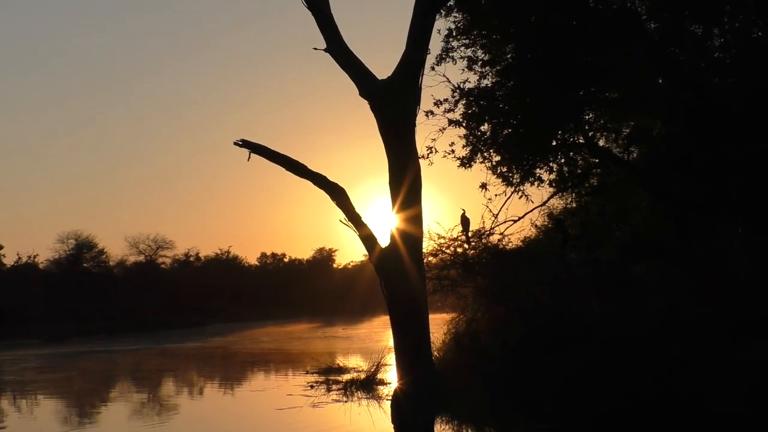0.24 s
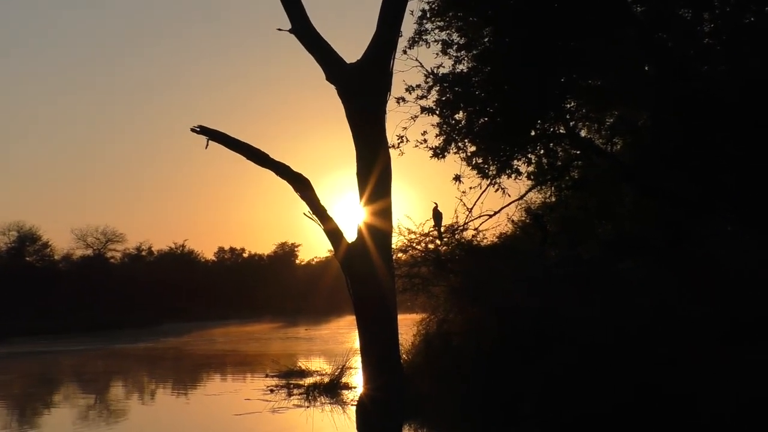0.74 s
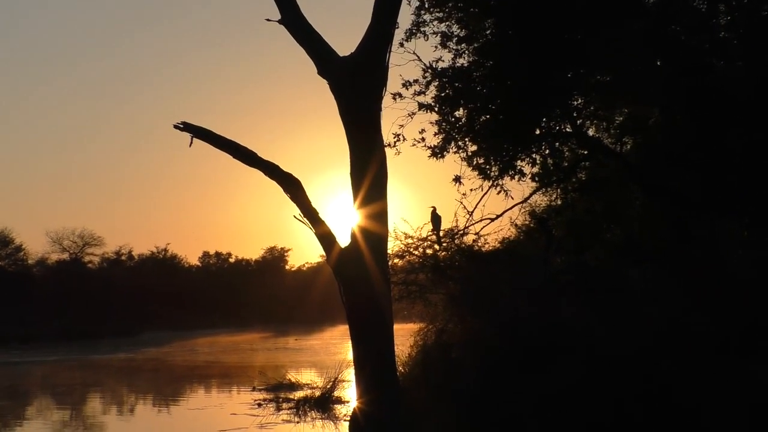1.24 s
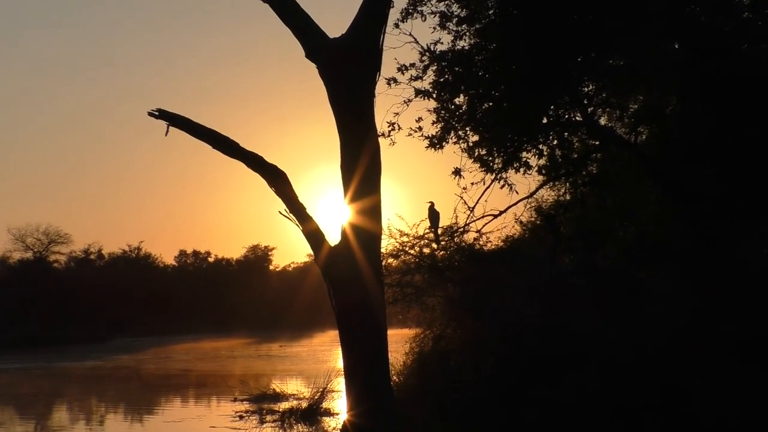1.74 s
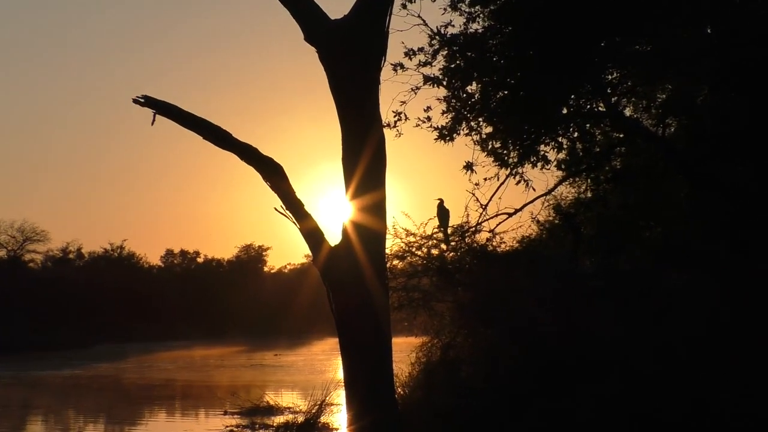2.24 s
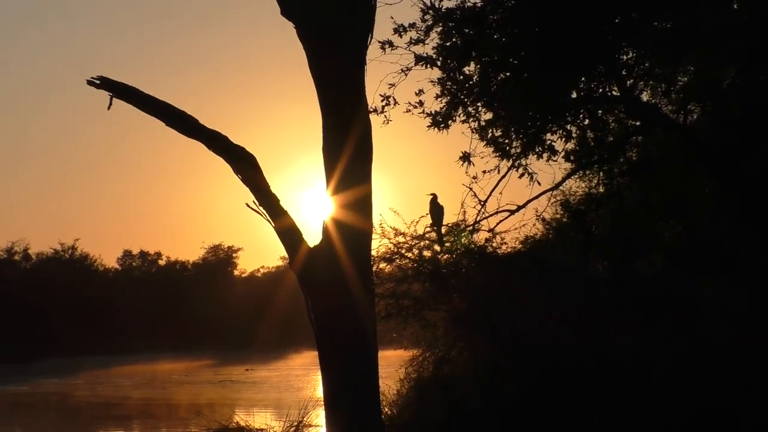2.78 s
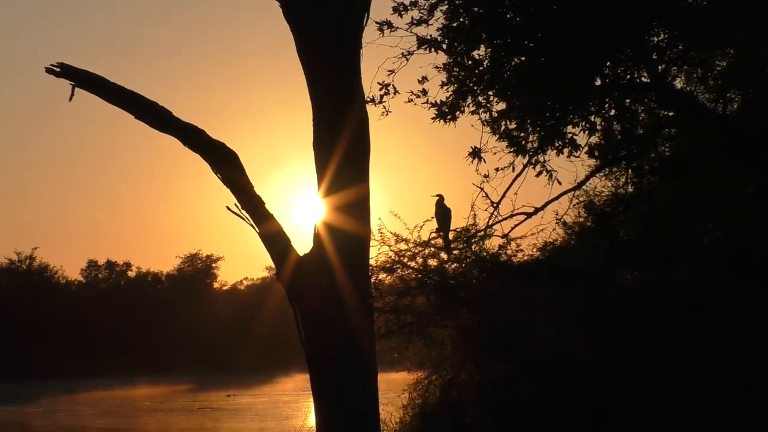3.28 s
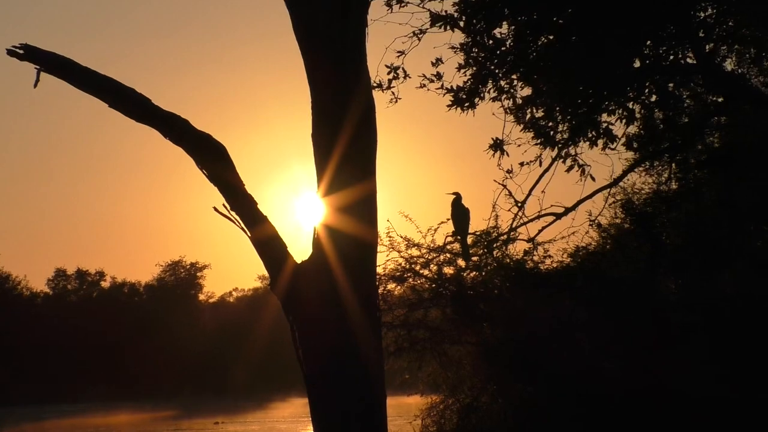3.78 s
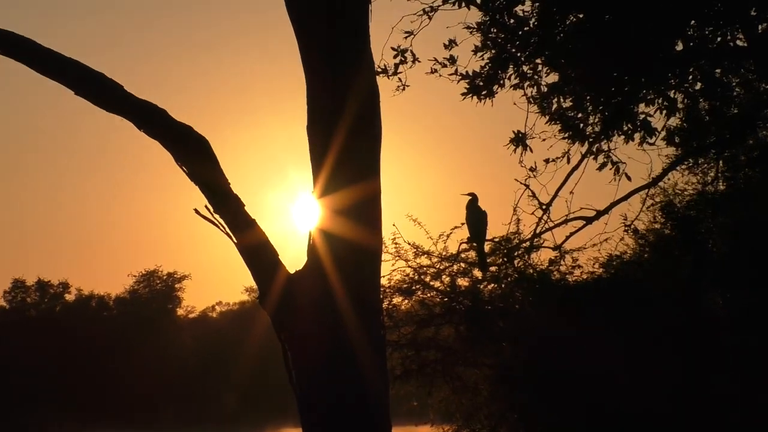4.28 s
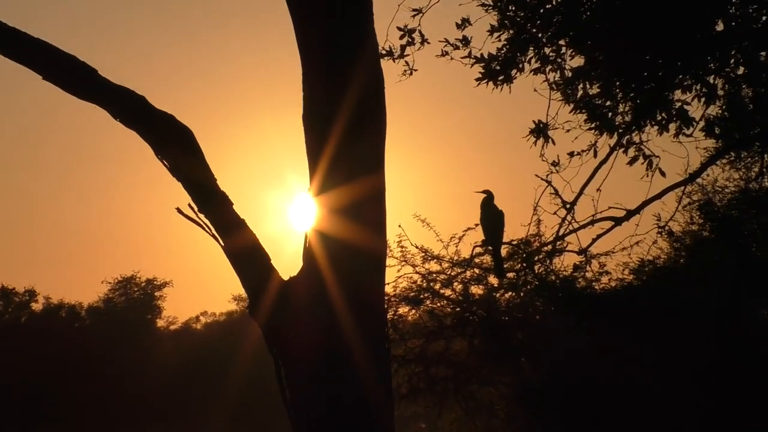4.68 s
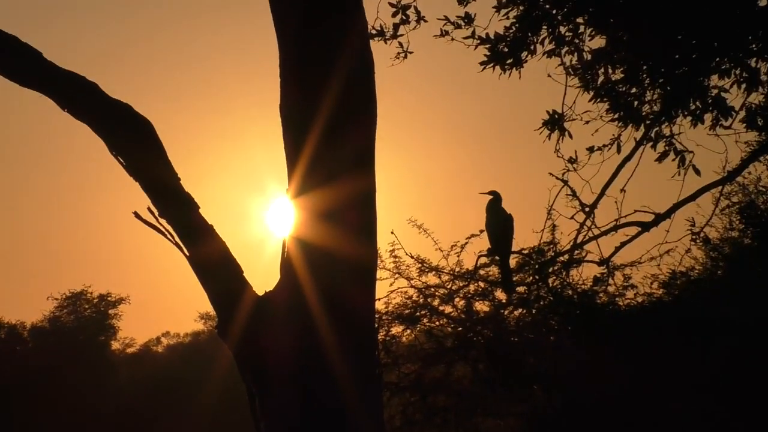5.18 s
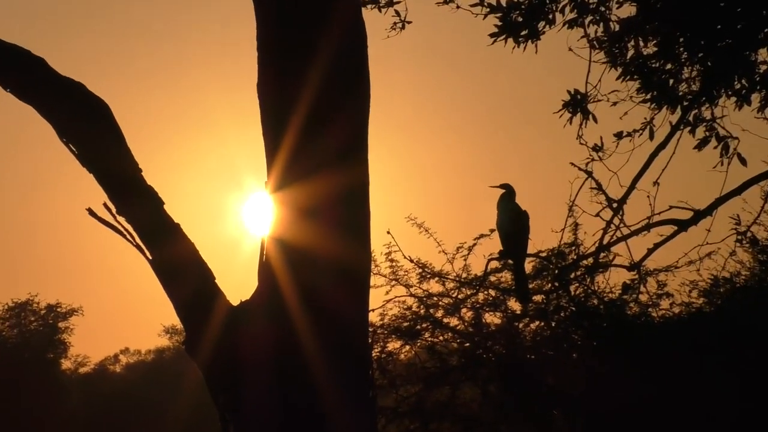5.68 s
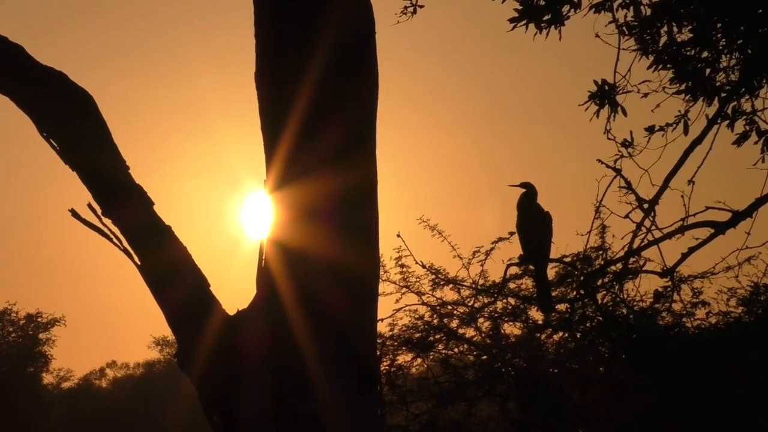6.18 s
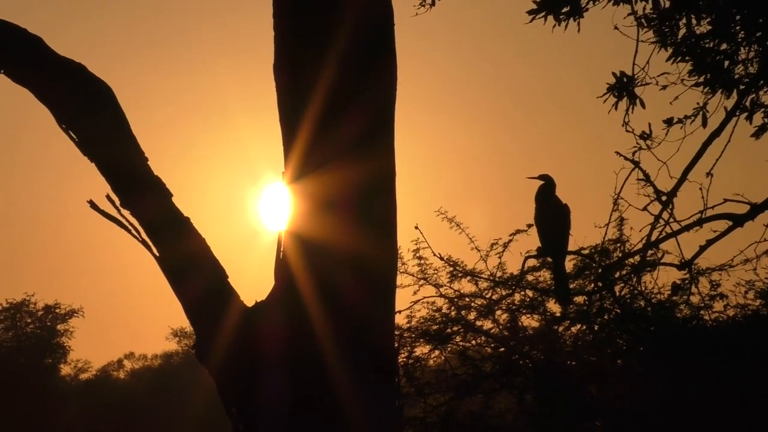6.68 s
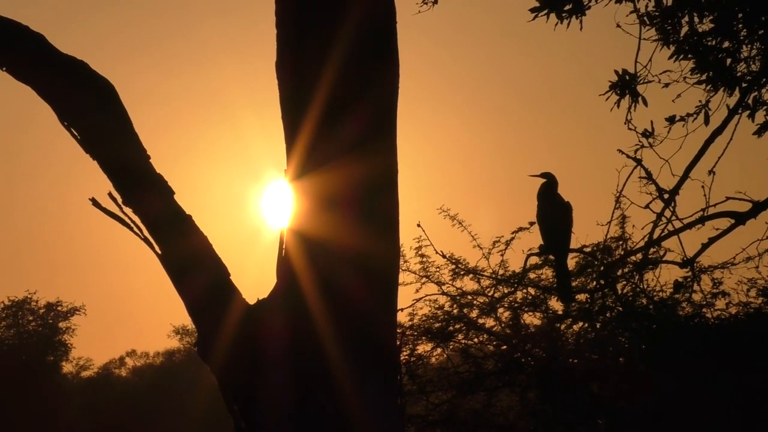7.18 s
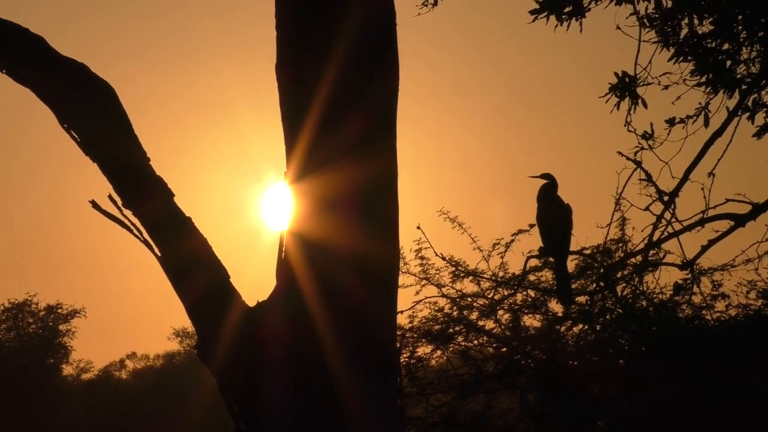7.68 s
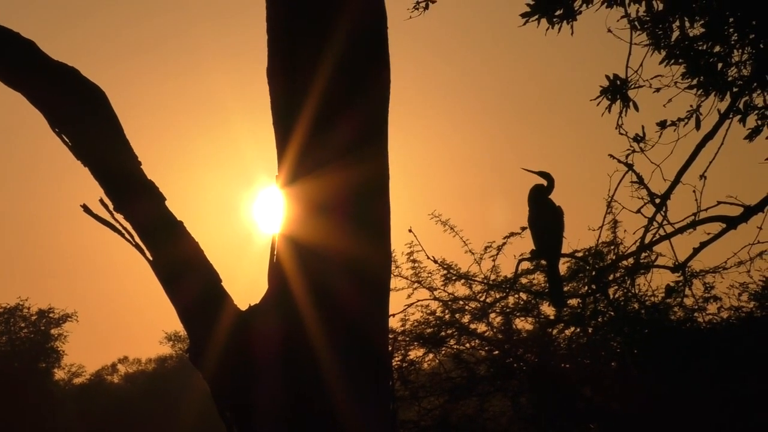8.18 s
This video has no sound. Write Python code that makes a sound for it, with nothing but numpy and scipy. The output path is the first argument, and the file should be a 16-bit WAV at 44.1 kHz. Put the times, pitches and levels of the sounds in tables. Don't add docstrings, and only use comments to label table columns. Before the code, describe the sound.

A quiet stereo dawn ambience with low air rumble, murmuring water and slight hiss. A close songbird gives two bright downward whistles after small hard knocks; feathers rustle. Far birds pipe thinly and slur quick notes. Harsh single clucks on the right turn into rasping, upward-breaking cackles led by short fluty whistles, closing in a dense run with another steep whistle and a soft flutter. Trees add a hazy echo.

```python
import sys
import numpy as np
from scipy import signal
from scipy.fft import rfft, irfft, next_fast_len
from scipy.io import wavfile
from scipy.ndimage import uniform_filter1d

SR = 44100
rng = np.random.default_rng(int(sys.argv[2]) if len(sys.argv) > 2 else 0)


def boost(x):
    u = np.asarray(x, float) / 20
    return 10 ** u


def generate_wav(signal):
    frames = np.transpose(np.atleast_2d(signal))
    scaled = np.clip(frames, -1, 1) * 32767
    pcm = np.round(scaled).astype(np.int16)
    wavfile.write(sys.argv[1], SR, pcm)


N = 371763


def rms_one(x):
    return x / np.sqrt(np.mean(x ** 2) + 1e-20)


def at_hz(points, hz):
    points_hz, points_db = np.array(points)[:, 0], np.array(points)[:, 1]
    return np.interp(np.log(hz), np.log(points_hz), points_db)


def bins_hz(size):
    return np.maximum(np.arange(size // 2 + 1) * SR / size, 1)


def wobble(rate_hz, size):
    knots = rng.standard_normal(size // 64 + 2)
    position = np.arange(size) * min(rate_hz / SR, 1 / 64)
    before = position.astype(int)
    part = (1 - np.cos(np.pi * (position % 1))) / 2
    return knots[before] + part * (knots[before + 1] - knots[before])


def unroll(rows, edge_s):
    s, *columns = np.transpose(rows)
    t = np.arange(s[0], s[-1], 1 / SR)
    fade = np.clip(np.minimum(t - s[0], s[-1] - t) / edge_s, 0, 1)
    return round(s[0] * SR), fade, [np.interp(t, s, c) for c in columns]


def add(track, start, sound):
    track[start:start + len(sound)] += sound[:N - start]


def coloured(white, spectrum):
    count = white.shape[-1]
    size = next_fast_len(count)
    shaped = rfft(white, size) * boost(at_hz(spectrum, bins_hz(size)))
    return rms_one(irfft(shaped, size)[..., :count])


def glides(rows, start_db, end_db):
    swell = 0.47
    return [[(s, a, db + start_db), (s + swell * d, a + swell * (b - a), db), (s + d, b, db + end_db)]
            for s, d, db, a, b in rows]


def whistles(notes, overtone_db, flutter_db, edge_s, waver, beak=None):
    out = np.zeros(N)
    for rows in notes:
        start, fade, (hz, db) = unroll(rows, edge_s)
        unsteady_hz = uniform_filter1d(hz, size=130) * (1 + waver * wobble(96.0, len(hz)))
        phase = 2 * np.pi * np.cumsum(unsteady_hz) / SR
        octave_db = overtone_db
        if beak is not None:
            octave_db = at_hz(beak, hz) - 0.79 * (db + 24.5)
        harmonics = np.sin(2 * phase) + boost(overtone_db) * np.sin(3 * phase)
        tone = np.sin(phase) + boost(octave_db) * harmonics
        level = boost(db + flutter_db * wobble(105.5, len(hz)))
        add(out, start, np.sqrt(2) * fade * level * tone)
    return out


def among_trees(x, pan_db, lead, near_db, far_db):
    t = np.arange(SR) / SR
    pan = boost(pan_db / 2 * np.array([[1], [-1]]))
    scatter = rng.standard_normal((3, len(t)))
    alike = np.clip(.8 - t / 3.6, .45, 1)
    scatter = alike * scatter[0] + np.sqrt(1 - alike ** 2) * scatter[1:]
    branches = pan * boost(near_db - 60 * t / 0.18)
    far_bank = np.minimum(t / 0.05, 1) * boost(far_db - 60 * t / 0.89)
    tail = signal.lfilter([1], [1, -.3], scatter * (branches + far_bank) / np.sqrt(SR / 100))
    pair = np.array([np.interp(np.arange(N) + lead, np.arange(N), x), x])
    return pan * pair + signal.fftconvolve(pair, tail, axes=1)[:, :N]


def ambience():
    # (frequency [Hz], density [dB per Hz])
    quiet_air = [(12, -39), (20, -8.5), (96, -0.5), (172, 0), (399, -7), (590, -16), (698, -7.5),
                 (1030, -5), (2460, -13.5), (2910, -12.5), (3250, -13.5), (6720, -32.5), (12100, -20.5),
                 (14700, -24.5), (16000, -23.5)]
    # (time [s], level [dB])
    river_levels = [(0, -54.5), (.4, -59.5), (.8, -52.5), (1.62, -50), (1.85, -59), (2.7, -50.5),
                    (3.26, -69), (3.61, -65), (3.8, -51), (4.34, -43), (4.75, -45), (5.35, -58.5),
                    (5.75, -47), (6.1, -53), (6.78, -46), (7.3, -50), (7.62, -45.5), (8.43, -44)]
    # (frequency [Hz], density [dB per Hz])
    riffle_colour = [(500, -22), (900, -4), (1700, 0), (2600, -2), (4500, -21), (9000, -28.5)]
    # (frequency [Hz], density [dB per Hz])
    breeze_colour = [(40, -14), (120, -2.5), (250, -5), (450, -5), (800, -27)]
    # (time [s], rise [dB])
    gust_rises = [
        (.4, 4.8),
        (.87, 8.3),
        (1.25, 4.7),
        (3.75, 4.6),
        (5.75, 5.2),
        (6.5, 3.8),
        (7.55, 4.2),
        (7.9, 6.8),
    ]
    # (centre [Hz], width [Hz], level [dB])
    insect_choruses = [
        (2840, 150, -63),
        (12500, 120, -97),
    ]
    # (frequency [Hz], side re mid [dB])
    field_width = [(60, -1), (110, -5), (200, -2.5), (380, -2), (700, -12.5), (1290, -4), (2380, -6.5),
                   (4400, -1), (8120, -4.5), (15000, 3.5)]
    # (frequency [Hz], left re right [dB])
    field_leaning = [(60, -0.5), (240, -0.9), (950, 0.37), (3770, -0.81), (15000, 0.21)]
    size = next_fast_len(N)
    hz = bins_hz(size)
    width = boost(at_hz(field_width, hz))
    lean = boost(at_hz(field_leaning, hz) / 2 * np.array([[1], [-1]]))

    def layer(shape):
        mid, side = rfft(rng.standard_normal((2, size))) * shape
        pair = irfft(lean * (mid + width * side * [[1], [-1]]), size)[:, :N]
        return pair / np.sqrt(np.mean(pair.mean(axis=0) ** 2))

    t = np.arange(N) / SR
    water_db = np.interp(t, *np.transpose(river_levels))
    breeze_db = -54.5 + 0.39 * (water_db - water_db.mean())
    gust_s = 0.18
    breeze_db += sum(db * np.exp(-((t - s) / gust_s) ** 2) for s, db in gust_rises)
    out = boost(-50 - 0.28 + 1.7 * wobble(3.11, N)) * layer(boost(at_hz(quiet_air, hz)))
    out += boost(water_db - 2.0 + 1.3 * wobble(9.0, N)) * layer(boost(at_hz(riffle_colour, hz)))
    out += boost(breeze_db - 4 + 1.4 * wobble(9.2, N)) * layer(boost(at_hz(breeze_colour, hz)))
    for centre_hz, width_hz, level_db in insect_choruses:
        chorus = layer(np.exp(-((hz - centre_hz) / width_hz) ** 2))
        out += boost(level_db + 1.1 * wobble(9.9, N)) * chorus
    return out


def far_pipers():
    # (time from start [s], pitch [Hz], level [dB])
    arch_shape = [
        (0, 2440, -1.5),
        (.018, 2710, -1),
        (.038, 2906, 1.5),
        (.06, 2730, -5),
    ]
    # (time [s], level [dB])
    arch_times = [
        (.088, -52),
        (.92, -51.5),
        (1.629, -49),
        (2.433, -48),
        (7.62, -47),
        (8.346, -46.5),
    ]
    # (start [s], level [dB], pitch [Hz])
    pip_times = [
        (5.53, -50, 2010),
        (6.62, -44.5, 1950),
        (6.92, -44, 1900),
        (7.285, -44, 1990),
        (7.46, -45, 1943),
        (7.61, -42, 1964),
        (7.765, -44, 1990),
        (8.15, -43, 1924),
        (8.33, -41, 1950),
    ]
    # (start [s], length [s], level [dB], first pitch [Hz], last pitch [Hz])
    pipe_glides = [(2.106, 0.056, -51.5, 2196, 1840), (2.175, 0.062, -49.5, 2104, 1890),
                   (2.245, 0.051, -59.5, 1890, 2000), (2.3, 0.047, -52, 1985, 2104),
                   (2.411, 0.023, -50, 2030, 2260), (2.427, 0.032, -53, 2235, 2070),
                   (3.265, 0.15, -58, 2050, 1445), (3.43, 0.047, -57.5, 2100, 1890),
                   (6.188, 0.092, -59, 2050, 1650), (6.69, 0.032, -52, 1410, 1500),
                   (6.733, .02, -46, 1830, 2170), (6.75, 0.04, -43.5, 2145, 2100),
                   (6.86, 0.038, -47.5, 2204, 2125)]
    arches = [[(s + t, hz, db + rel_db) for t, hz, rel_db in arch_shape] for s, db in arch_times]
    pips = [(s, 0.023, db, hz, hz) for s, db, hz in pip_times]
    notes = arches + glides(pips, start_db=-4, end_db=-15) + glides(pipe_glides, start_db=3.5, end_db=-2)
    far = whistles(notes, overtone_db=-29, flutter_db=1.0, edge_s=0.0038, waver=0.0053)
    return among_trees(far, pan_db=-6.5, lead=-0.77, near_db=-6.5, far_db=-15.5)


def knocks():
    # (time [s], peak [dB], bright part re peak [dB], leg pitch [Hz])
    tripod_knocks = [(0.652, -27.5, -2.5, 300), (0.724, -32, 6.5, 285), (0.766, -28.5, -1.5, 330),
                     (2.714, -29.5, -3.5, 287), (2.74, -32, -0.5, 307), (3.84, -34, -15, 450),
                     (5.618, -34.5, -13, 323), (7.582, -27.5, -25, 195), (7.6, -34, -19, 343),
                     (7.626, -40, -20, 180), (7.678, -41, -20, 190)]
    # (frequency [Hz], level [dB], t60 [s])
    frame_modes = [(270, 3, 0.012)]
    # (frequency [Hz], level [dB], t60 [s])
    clamp_modes = [(757, -6.5, 0.082), (1235, 8, 0.01), (1630, 8, 0.0088), (3100, -0.5, 0.011),
                   (5000, -24, 0.0058)]
    out, t = np.zeros((2, N)), np.arange(SR // 5) / SR
    for s, db, bright_db, leg_hz in tripod_knocks:
        start = round(s * SR)
        modes = [(leg_hz, 0, .045)] + frame_modes
        modes = modes + [(hz, m + bright_db, t60) for hz, m, t60 in clamp_modes]
        luck = rng.normal(0, 1, (len(modes), 3))
        noisy_tail = signal.lfilter([1, -1], [1, -1.55, .7], rng.standard_normal((2, len(t))))
        for side in (0, 1):
            add(out[side], start, rms_one(noisy_tail[side]) * boost(db + bright_db - 15 - 60 * t / 0.047))
        for (hz, mode_db, t60), (level_luck, side_luck, phase_luck) in zip(modes, luck):
            dying = boost(db - 3.5 + mode_db + 2.0 * level_luck - 60 * t / t60)
            dying *= np.minimum(t * hz * 3, 1)
            for side, sign in enumerate((1, -1)):
                ring = np.sin(2 * np.pi * hz * t + sign * 0.39 * phase_luck)
                add(out[side], start, dying * boost(sign * (1.5 + 1.8 * side_luck)) * ring)
    return out


def near_songbird():
    # (time [s], pitch [Hz], level [dB])
    songbird_sweeps = [
        [(.7, 5270, -78), (.733, 6020, -69), (.743, 5820, -34.5), (.758, 5380, -31), (.771, 5280, -26.5),
         (.8, 4684, -17), (.811, 4530, -17.5), (.822, 2840, -48.5)],
        [(.94, 5050, -75), (.967, 5640, -48.5), (.98, 5480, -37), (.996, 5280, -25), (1.025, 4680, -18),
         (1.042, 4380, -17), (1.062, 3880, -47)],
        [(7.345, 6220, -65), (7.356, 6650, -42), (7.384, 5550, -17.5), (7.392, 5280, -27), (7.4, 5160, -14.5),
         (7.411, 4764, -16), (7.44, 4180, -19), (7.47, 3680, -29.5), (7.497, 2750, -37.5)],
    ]
    # (pitch [Hz], octave re a -25 dB note [dB])
    songbird_beak = [(3000, -50), (3900, -33.5), (4600, -23.5), (5300, -21.5), (6400, -17)]
    song = whistles(songbird_sweeps, overtone_db=-7, flutter_db=3.0, edge_s=0.00087, waver=0.00044,
                    beak=songbird_beak)
    return among_trees(song, pan_db=-8.5, lead=1.54, near_db=-9.5, far_db=-22.5)


def rustle():
    # (time [s], peak [dB], low part re peak [dB], t60 [s])
    wing_puffs = [(1.2105, -42, 11.5, 0.13), (1.226, -29.5, 6.5, 0.083), (1.2494, -55, 14, 0.14),
                  (1.307, -28.5, 3.5, 0.12), (1.3166, -32.5, 5, 0.092), (1.3413, -38, 5.5, 0.15),
                  (1.363, -28, 2, 0.069), (1.3933, -38.5, 6.5, 0.084), (1.4094, -75, 0, 0.1),
                  (1.7744, -45, -1, 0.11), (3.1194, -50, 8, 0.13), (6.971, -36, -13, 0.2),
                  (7.919, -38, 3, 0.11), (8.02, -42, 12.5, 0.23)]
    # (time [s], level [dB])
    wing_flurry = [
        (7.84, -62),
        (7.862, -59),
        (7.882, -46),
        (7.932, -40),
        (7.944, -45.5),
        (8.036, -40.5),
        (8.12, -58),
    ]
    white = rng.standard_normal((2, N)) * boost(1.33 * wobble(400.0, N))
    bright = coloured(white, [(2500, -9.5), (4500, -1.5), (9000, -5.5), (15000, -15.0)])
    dull = coloured(white[::-1], [(500, -36), (1000, 0.5), (2000, 4.0), (3500, -5.5), (6000, -40)])
    high, low, t = np.zeros(N), np.zeros(N), np.arange(SR // 3) / SR
    for s, db, low_db, t60 in wing_puffs:
        puff = np.minimum(t / 0.00053, 1) * boost(db - 8 - 60 * t / max(t60, .01))
        add(high, round(s * SR), puff)
        add(low, round(s * SR), puff * boost(low_db))
    start, fade, (db,) = unroll(wing_flurry, .015)
    add(high, start, fade * boost(db + 4.5))
    add(low, start, fade * boost(db - 3.0))
    first, second = bright * high + dull * low
    return np.array([first + 0.32 * second, first - 0.75 * second])


def hazy_slurs():
    # (start [s], length [s], level [dB], first pitch [Hz], last pitch [Hz])
    slur_notes = [(1.89, .045, -63, 3000, 4240), (1.99, 0.035, -60, 4400, 3490),
                  (2.028, 0.027, -65, 3600, 4500), (2.24, 0.036, -59, 2620, 4430),
                  (2.33, 0.029, -62, 4700, 4300), (2.352, .02, -51, 3780, 2910),
                  (2.37, 0.032, -54, 3500, 3020), (4.17, 0.05, -55, 2800, 4640),
                  (5.06, 0.036, -52, 2890, 2545), (5.112, 0.025, -43, 2530, 2430),
                  (6.255, 0.039, -47, 3380, 2940), (2.385, .02, -54, 3870, 3100),
                  (2.4, .04, -59, 4610, 3600), (5.505, 0.018, -60, 3500, 4310),
                  (7.705, 0.036, -63, 6520, 6400)]
    hazy = whistles(glides(slur_notes, start_db=-1.5, end_db=-5), overtone_db=-24, flutter_db=5.0,
                    edge_s=0.0044, waver=.025)
    return among_trees(hazy, pan_db=-3.5, lead=.3, near_db=-3, far_db=-7.5)


def cackles(calls, rough, sharp, divide, odd_db, even_db, clear_hz):
    # (frequency [Hz], density [dB per Hz])
    throat_colour = [(1000, -39), (1800, -26.5), (2200, -4.5), (2700, -3), (3200, 6.5), (3600, -0.5),
                     (4200, -5), (4800, -8), (5500, -10.5), (6600, -18.5), (9000, -28), (12000, -53)]
    top_s = 0.022
    break_s, break_lasts_s, climb_s = .042, 0.01196, 0.0557
    out = np.zeros(N)
    for s, length, level_db, first_hz, later_hz in calls:
        t = np.arange(0, length, 1 / SR)
        size = len(t)
        late = np.maximum(t - .085, 0)
        fade = np.clip(np.minimum(t, length - t) / 0.0038, 0, 1)
        db = level_db + np.interp(t, [0, top_s, max(length, top_s)], [-7, 0, -6.5])
        landed_hz = min(later_hz, max(first_hz, 0.97 * later_hz))
        turns_s = np.cumsum([0, break_s / 2, break_s / 2, break_lasts_s, climb_s, climb_s])
        turns_hz = [sharp * first_hz, first_hz, first_hz, landed_hz, later_hz, 0.94 * later_hz]
        hz = np.interp(t, turns_s, turns_hz) / divide
        jitter = .013 * (1 + 15.0 * late) * wobble(152.6, size) + 0.0082 * wobble(29.8, size)
        phase = 2 * np.pi * np.cumsum(hz * (1 + jitter)) / SR
        voice = np.zeros(size)
        for k in range(4, 17):
            partial_db = at_hz(throat_colour, k * hz) + (odd_db if k % 2 else even_db)
            partial_db += 4.0 * wobble(91.0, size)
            partial_db -= 14 * np.maximum(np.log2(k * hz / clear_hz), 0)
            stray = 2 * np.pi * np.cumsum(45 * wobble(198.9, size)) / SR
            voice += boost(partial_db) * np.sin(k * phase + stray)
        rasp = coloured(rng.standard_normal(size), throat_colour) * boost(4.5 * wobble(125.0, size))
        frayed = np.clip(rough + 4.0 * late, 0, .7)
        call = np.sqrt(1 - frayed) * rms_one(voice) + np.sqrt(frayed) * rms_one(rasp)
        add(out, round(s * SR), fade * boost(db) * call)
    return out


def ground_bird_calls():
    # (start [s], length [s], level [dB], first pitch [Hz], later pitch [Hz])
    cluck_calls = [
        (2.508, 0.058, -35, 450.4, 428),
        (3.692, 0.057, -33.5, 454.8, 460),
    ]
    # (start [s], length [s], level [dB], first pitch [Hz], pitch after the voice break [Hz])
    cackle_calls = [
        (4.405, 0.091, -36, 833, 1035),
        (5.12, 0.064, -35.5, 900, 890),
        (5.715, 0.14, -34, 854, 1012),
        (6.38, 0.15, -33.5, 871, 1025),
        (7.095, 0.17, -33.5, 878, 1020),
        (7.845, 0.14, -32.5, 946, 1020),
        (8.142, 0.071, -36, 934, 1023),
    ]
    # (start [s], length [s], level [dB], first pitch [Hz], later pitch [Hz])
    yelp_calls = [
        (8.09, .052, -35, 1280, 1270),
    ]
    # (start [s], length [s], level [dB], first pitch [Hz], last pitch [Hz])
    upper_tones = [
        (2.51, 0.042, -47.5, 4155, 3975),
        (3.695, 0.04, -43.5, 4130, 4200),
        (4.41, 0.051, -41, 4190, 4150),
    ]
    harsh = cackles(cluck_calls, .45, 0.99, 1.0, odd_db=8, even_db=-7, clear_hz=4300)
    harsh += cackles(cackle_calls, .25, 1.04, 2, odd_db=-10.0, even_db=0.0, clear_hz=6500)
    harsh += cackles(yelp_calls, .2, 1.04, 2, odd_db=-25, even_db=0, clear_hz=4600)
    harsh += whistles(glides(upper_tones, start_db=-1.5, end_db=-17), overtone_db=-35, flutter_db=2.5,
                      edge_s=.003, waver=0.019)
    return among_trees(harsh, pan_db=-9.5, lead=0.66, near_db=-6, far_db=-11.0)


def ground_bird_leads():
    # (start [s], length [s], level [dB], first pitch [Hz], last pitch [Hz])
    lead_whistles = [(5.028, 0.035, -45, 3400, 3350), (5.062, 0.02, -54, 3290, 3270),
                     (5.542, 0.047, -46.5, 2840, 2870), (5.648, 0.044, -46, 2704, 2570),
                     (5.705, 0.046, -45, 2610, 2600), (5.622, 0.043, -49, 3420, 3250),
                     (6.25, .02, -41.5, 2650, 2780), (6.287, 0.068, -37.5, 2517, 2552),
                     (6.362, 0.036, -44, 2590, 2700), (6.982, .022, -41.5, 3200, 2500),
                     (6.998, 0.085, -37, 2490, 2586), (7.078, 0.05, -42, 2600, 2800),
                     (7.74, 0.024, -31, 2447, 2467), (7.776, 0.016, -32, 2500, 2560),
                     (7.805, 0.019, -47, 2490, 2480), (7.83, 0.03, -41, 2535, 2650),
                     (5.082, 0.0068, -38, 3250, 3150), (6.3, 0.041, -55, 3730, 3840),
                     (8.055, 0.085, -41, 2800, 2720), (7.795, 0.0082, -38, 2530, 2510)]
    # (pitch [Hz], octave re a -25 dB note [dB])
    lead_beak = [(2500, -35), (2900, -43), (3350, -35.5), (4100, -52)]
    leads = whistles(glides(lead_whistles, start_db=-1, end_db=-5.5), overtone_db=-22.5, flutter_db=4.0,
                     edge_s=0.004, waver=.014, beak=lead_beak)
    return among_trees(leads, pan_db=-6.5, lead=.1, near_db=-9, far_db=-9)


def scene():
    birds = near_songbird() + ground_bird_calls() + ground_bird_leads()
    birds += far_pipers() + hazy_slurs()
    return birds + rustle() + knocks() + ambience()


def roll_off(x):
    return signal.sosfilt(signal.butter(12, 15830, fs=SR, output="sos"), x)


def record(dry):
    # (frequency [Hz], level [dB])
    treble_width = [(4500, -0.5), (7000, -11), (12000, -8), (15500, -4.5)]
    # (low edge [Hz], high edge [Hz], excess of the whistle band that silences them [dB])
    gated_bands = [(6150, 6800, 23), (6800, 7500, 27), (7500, 8200, 38), (8200, 9400, 50)]
    size = next_fast_len(N)
    hz = bins_hz(size)
    left, right = rfft(dry, size) * (hz < 15830)
    mid = (left + right) / 2
    side = (left - right) / 2 * boost(at_hz(treble_width, hz))
    pair = np.array([mid + side, mid - side])
    out = irfft(pair, size)
    whistle = irfft(pair * ((hz > 3800) & (hz < 5900)), size)
    for low_hz, high_hz, margin_db in gated_bands:
        band = irfft(pair * ((hz >= low_hz) & (hz < high_hz)), size)
        excess = np.sum(whistle ** 2 - (boost(margin_db) * band) ** 2, axis=0)
        silenced = uniform_filter1d(excess, size=1024) > 0
        out -= band * uniform_filter1d(silenced * 1., size=512)
    return roll_off(out[:, :N])


dry = scene()
out = record(dry)
generate_wav(out)
```